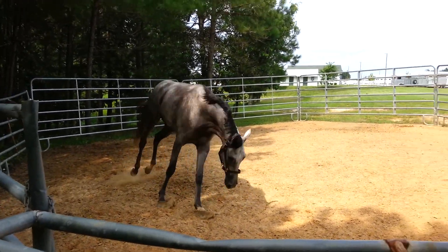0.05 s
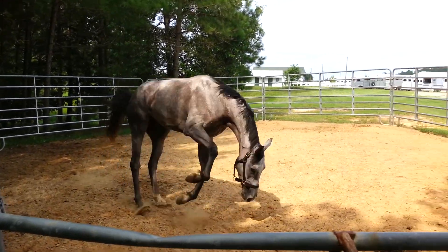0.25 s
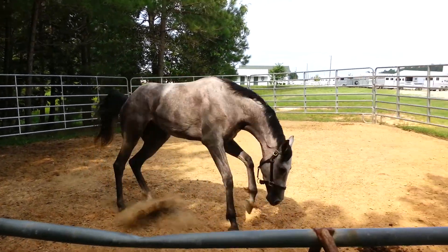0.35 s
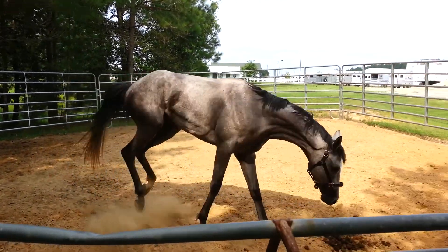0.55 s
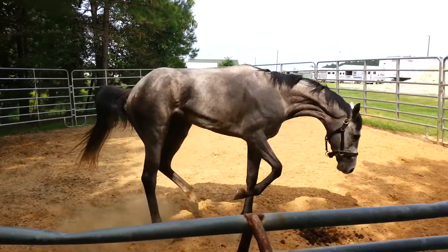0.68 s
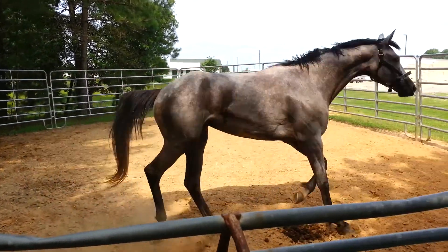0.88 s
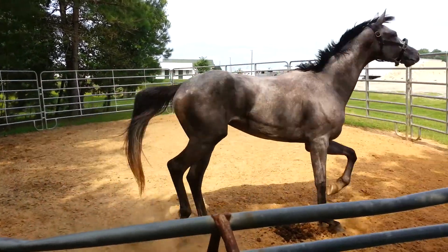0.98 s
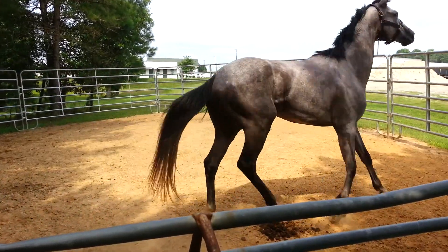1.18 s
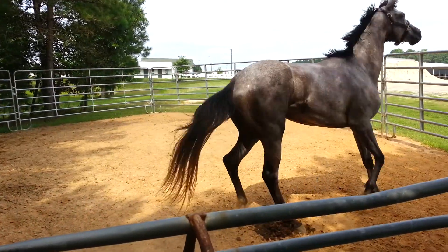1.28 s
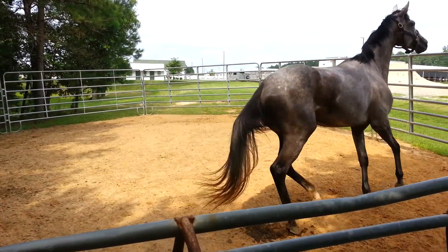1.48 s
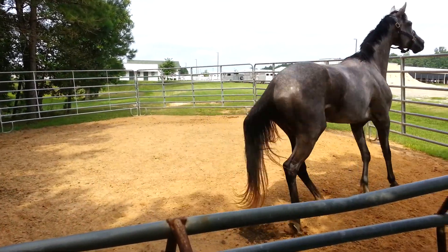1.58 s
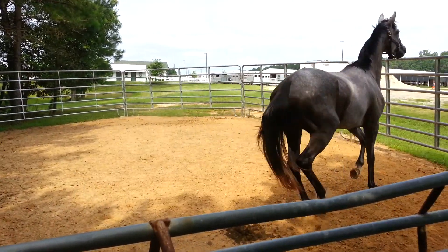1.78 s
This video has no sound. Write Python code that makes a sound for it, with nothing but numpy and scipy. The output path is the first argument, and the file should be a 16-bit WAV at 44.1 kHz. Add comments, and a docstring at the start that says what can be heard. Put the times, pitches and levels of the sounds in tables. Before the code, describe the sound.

One loud, breathy horse snort flutters, whistles briefly and ends hollow, near the microphone in an outdoor pen. Then hooves thud softly and scatter sand, and a halter buckle gives a tiny jingle over a faint distant hum.

```python
"""One long, loud snort from a horse trotting round a sandy outdoor pen.
Air rushes through its nose while the nostrils flutter; the blow whistles at its height and
turns hollow as it ends. Then hooves thud and scatter sand, and a halter buckle jingles.
A far motor hums throughout under a faint insect hiss."""
import sys
import numpy as np
from scipy import signal
from scipy.fft import rfft, irfft
from scipy.io import wavfile
from scipy.ndimage import uniform_filter1d, minimum_filter1d, map_coordinates

SR = 44100
rng = np.random.default_rng(int(sys.argv[2]) if len(sys.argv) > 2 else 0)


def master_out(mix):
    """Clip the mix to full scale and print it as 16-bit PCM to the path in sys.argv[1]."""
    frames = np.transpose(np.atleast_2d(mix))
    ceiling = np.clip(frames, -1, 1)
    pcm = np.round(ceiling * 32767).astype(np.int16)
    wavfile.write(sys.argv[1], SR, pcm)


N = 81585
T = np.arange(N) / SR


def amp(db):
    """Decibels to gain."""
    return 10 ** (np.asarray(db) / 20)


def unit(x):
    """Scale to rms 1."""
    return x / np.sqrt(np.mean(x ** 2) + 1e-20)


def curve(rows, column=1):
    """One column, interpolated linearly in time."""
    rows = np.array(rows)
    return np.interp(T, rows[:, 0], rows[:, column])


def level(rows, column=1):
    """Gain from a dB curve, dying away beyond its ends."""
    outside_s = np.maximum(rows[0][0] - T, 0) + np.maximum(T - rows[-1][0], 0)
    return amp(curve(rows, column)) * np.exp(-outside_s / 0.013)


def colour(x, spectrum):
    """Filter by a spectrum, rms 1."""
    hz, db = np.transpose(spectrum)
    bins_hz = np.fft.rfftfreq(N, 1 / SR)
    gain = amp(np.interp(np.log(bins_hz + 1), np.log(hz), db))
    return unit(irfft(rfft(x) * gain, N))


def noise():
    """White noise."""
    return rng.standard_normal(N)


def wander(hz):
    """Random drift up to a rate, rms 1."""
    rolloff = 1 + (np.fft.rfftfreq(N, 1 / SR) / hz) ** 4
    return unit(irfft(rfft(noise()) / rolloff, N))


def resonate(x, hz, width_hz):
    """Steep resonance whose centre may move, rms 1."""
    carrier = np.exp(2j * np.pi * np.cumsum(hz * np.ones(N)) / SR)
    pole = np.exp(-np.pi * width_hz / SR)
    baseband = signal.lfilter([1], [1, -2 * pole, pole * pole], x / carrier)
    return unit((carrier * baseband).real)


def noise_bands(bands, drive=1):
    """Sum of resonances, each fed its own noise times drive."""
    return sum(amp(db) * resonate(noise() * drive, hz, width_hz) for hz, width_hz, db in bands)


def burst(start_s, rise_s, decay_s):
    """Linear rise, exponential decay."""
    age_s = T - start_s
    return np.clip(age_s / rise_s, 0, 1) * np.exp(-np.maximum(age_s - rise_s, 0) / decay_s)


def ring(start_s, hz, decay_s):
    """Damped sine with a soft onset, envelope peak 1."""
    age_s = np.maximum(T - start_s, 0)
    return age_s / decay_s * np.exp(1 - age_s / decay_s) * np.sin(2 * np.pi * hz * age_s)


def outdoors():
    """Steady far air, a motor hum and thin insect bands."""
    # air spectrum: freq_hz, gain_db
    air_spectrum = [(25,-30),(50,-12.5),(110,-5),(175,-1),(240,-5.5),(420,-11),(560,-12),(900,-15.5),(1500,-21.5),(2900,-21.5),(3700,-17.5),(5000,-19.5),(6500,-28),(10000,-28),(14500,-31.5)]
    # motor and insect bands: centre_hz, width_hz, level_db
    drones = [(176.3,8.7,-57.5),(2234,100,-63.5),(3800,28,-64.5),(4460,130,-66),(5000,44,-65)]
    swell = amp(0.5 * wander(hz=5))
    return amp(-46.5) * colour(noise() * swell, air_spectrum) + noise_bands(drones)


def tree_echo(x, level_db=-28, t60_s=0.6, top_hz=3500):
    """Faint, dull scatter from fence and trees."""
    tail = signal.lfilter(*signal.butter(1, top_hz, fs=SR), noise())
    tail *= np.minimum(T / 0.018, 1) * amp(-60 * T / t60_s)
    return amp(level_db) * signal.fftconvolve(x, tail / np.linalg.norm(tail))[:N]


def buckle():
    """Small metal parts of the halter rattle together."""
    # metal modes: centre_hz, width_hz, gain_db
    modes = [(3330,1400,2),(4960,2200,0),(6740,170,0),(7640,1800,-2.5),(10300,560,-4),(11300,350,-3.5),(12810,400,-5)]
    return amp(-39) * unit(noise_bands(modes)) * burst(start_s=1.724, rise_s=0.012, decay_s=0.018)


def sand(spectrum, clump_db):
    """Clumped sand grains: noise with a fast random level."""
    return colour(noise() * amp(clump_db * wander(hz=500)), spectrum)


def scuffs():
    """Hooves scuff through sand."""
    # scuffs: start_s, level_db, rise_s, decay_s
    strokes = [(0.041,-38,0.0034,0.012),(0.053,-38.5,0.013,0.012),(0.894,-45,0.0061,0.073),(1.284,-42.5,.01,0.0084),(1.540,-40,0.005,0.0057),(1.586,-37,0.0065,0.0088)]
    # scuff spectrum: freq_hz, gain_db
    spectrum = [(100,-29),(500,1.5),(1100,0.5),(1800,-2.5),(2800,-8.5),(4500,-11.5),(7000,-17),(14000,-27.5)]
    envelope = sum(amp(db) * burst(start_s, rise_s, decay_s) for start_s, db, rise_s, decay_s in strokes)
    return sand(spectrum, clump_db=3) * envelope


def hooves():
    """Each hoof gives a dead thud, a ground thump, a knock of horn and a spray of sand."""
    # impacts: time_s, thud_db, thud_hz, ground_db, knock_hz, knock_db, sand_db, sand_decay_s
    impacts = [(.828,-21.5,790,-31.5,1140,-32.5,-32,0.016),(0.881,-20,890,-48,1120,-32.5,-31.5,0.011),(.9,-32,400,-38,467,-41,-52,.01),(1.2445,-29.5,510,-56,603,-31.5,-46,0.022),(1.2499,-25.5,1080,-54,1584,-42,-37,0.014),(1.2703,-36,450,-50,584,-45,-50,.008),(1.5952,-22,990,-36,1000,-36.5,-31.5,0.013),(1.6464,-22.5,540,-32,716,-37,-35,0.0098)]
    # spray spectrum: freq_hz, gain_db
    spray_spectrum = [(60,-10),(200,-0.5),(550,2.5),(1150,-0.5),(1450,-4.5),(2200,-6),(2900,-13),(4000,-10.5),(6500,-24.5),(14000,-32)]
    grains = sand(spray_spectrum, clump_db=4.5)
    out = np.zeros(N)
    for time_s, thud_db, thud_hz, ground_db, knock_hz, knock_db, sand_db, sand_decay_s in impacts:
        width_s = 0.33 / thud_hz
        offset = (T - time_s) / width_s
        out += amp(thud_db) * (2 * offset ** 2 - 1) * np.exp(-offset ** 2)
        out += amp(ground_db) * ring(time_s, hz=226, decay_s=0.0033)
        out += amp(knock_db) * ring(time_s, knock_hz, decay_s=0.004)
        out += amp(sand_db) * grains * burst(time_s, rise_s=0.0015, decay_s=sand_decay_s)
    return out


def edge_tone(hz, jitter=0.011, waver_db=1.1):
    """A whistle tone made unsteady by turbulence."""
    phase = 2 * np.pi * np.cumsum(hz * (1 + jitter * wander(hz=68))) / SR
    return unit(np.sin(phase) * amp(waver_db * wander(hz=60)))


def whistle():
    """One long edge tone in the nostril, two short falling ones at the hardest push."""
    # long tone: time_s, pitch_hz, level_db
    tone = [(.19,574,-47),(.225,516.6,-29),(.27,481.1,-29.5),(.32,514.2,-33),(.385,531.8,-24),(.425,529.4,-24.5),(.46,534,-15.5),(.505,552.3,-19.5),(.53,577.6,-24.5),(.57,554.3,-29.5),(.65,550.2,-40)]
    # short tones: start_s, length_s, from_hz, to_hz, level_db
    squeals = [(0.371,0.101,745,682,-20),(0.373,.075,1090,1038,-18.5)]
    out = edge_tone(curve(tone)) * level(tone, column=2)
    for start_s, length_s, from_hz, to_hz, db in squeals:
        progress = np.clip((T - start_s) / length_s, 0, 1)
        out += amp(db) * np.sin(np.pi * progress) * edge_tone(from_hz + (to_hz - from_hz) * progress)
    return out


def nostril_buzz(phase, waver_db=0.5):
    """Harmonics of the fluttering nostrils, each wavering in level."""
    # harmonics: order, gain_db
    harmonics = [(1,-8),(2,0.5),(3,1.5),(4,1)]
    return unit(sum(amp(db + waver_db * wander(hz=24.7)) * np.cos(order * (phase + order * np.pi / 4))
                    for order, db in harmonics))


def nostril_flaps():
    """Single hard flaps of the nostrils."""
    # flaps: start_s, peak_db, pitch_hz, decay_s
    flaps = [(0.3098,-15.5,270,0.0019),(.393,-1,1030,0.00065),(0.483,-12,865,0.00078),(0.527,-13,291,0.0015),(.690,-5.5,622,0.0023)]
    return sum(amp(db) * ring(start_s, hz, decay_s) for start_s, db, hz, decay_s in flaps)


def relax(x, sag=0.091, from_s=0.55, to_s=0.76):
    """The spectrum sinks as the nostrils slacken."""
    speed = 1 - sag * np.clip((T - from_s) / (to_s - from_s), 0, 1)
    return map_coordinates(x, [np.cumsum(speed)], order=3, mode="mirror")


def air_rush(flow):
    """Turbulent air through the nose: the body of the blow."""
    # rush envelope: time_s, level_db
    envelope = [(.12,-64),(.15,-44.5),(.195,-44.5),(.225,-28),(.262,-21),(.3,-20),(.352,-21),(.39,-16),(.42,-15.5),(.45,-17.5),(.495,-13.5),(.53,-18),(.56,-19.5),(.615,-23),(.665,-27),(.705,-31),(.735,-38),(.78,-39),(.82,-62)]
    # rush spectrum before the sag: freq_hz, gain_db
    spectrum = [(40,-46),(90,-25),(160,-7.5),(320,-7),(430,-12),(560,0),(860,-5),(1060,3),(1300,-1.5),(1480,-5.5),(1640,-1.5),(1850,-22.5),(2600,-48),(6000,-68)]
    return relax(colour(noise() * flow, spectrum)) * level(envelope)


def nose_hiss(flow):
    """The air jet hisses, sounds narrow upper resonances and spurts wetly."""
    # hiss envelope: time_s, level_db
    envelope = [(.16,-57),(.21,-45),(.25,-34),(.278,-29.5),(.345,-28),(.385,-25),(.412,-20.5),(.445,-25.5),(.529,-24),(.54,-29),(.615,-29.5),(.645,-34),(.7,-32.5),(.76,-39.5),(.8,-50)]
    # hiss spectrum before the sag: freq_hz, gain_db
    spectrum = [(900,-60),(1800,-3),(2020,0),(2380,-0.5),(2600,0),(2900,-8.5),(3550,-4),(4250,-10.5),(5100,-11.5),(6500,-17),(7800,-20.5),(9500,-26),(14500,-54)]
    # upper nasal resonances before the sag: centre_hz, width_hz, gain_db
    resonances = [(2353,170,-8),(3785,200,-16)]
    # wet spurts: start_s, level_db
    spurts = [(0.238,-36),(0.407,-24.5),(0.5263,-26.5),(0.613,-32.5)]
    hiss = unit(colour(noise() * flow, spectrum) + noise_bands(resonances, flow))
    spurt_gain = sum(amp(db) * burst(start_s, rise_s=0.0026, decay_s=0.0021) for start_s, db in spurts)
    return relax(hiss) * (level(envelope) + spurt_gain)


def nasal_hollow(flow):
    """Hollow resonances of the nose rise, then fall as the blow closes."""
    # resonance envelope: time_s, level_db
    envelope = [(.13,-59),(.16,-45),(.2,-39),(.27,-31),(.34,-27.5),(.39,-15.5),(.44,-22.5),(.53,-20),(.6,-22),(.66,-19),(.705,-16),(.73,-27),(.76,-33.5),(.795,-54)]
    # nasal resonances: base_hz, width_hz, gain_db
    resonances = [(575.5,120,-8),(715,130,-4)]
    # resonance glide: time_s, freq_ratio
    glide = [(.2,0.81),(.39,1.07),(.46,1.062),(.55,1.057),(.64,0.973),(.72,0.85)]
    # overall filter: freq_hz, gain_db
    spectrum = [(100,-18),(450,-0.5),(760,0.5),(880,-4),(3000,-15)]
    hollow = sum(amp(db) * resonate(noise() * flow, base_hz * curve(glide), width_hz)
                 for base_hz, width_hz, db in resonances)
    hollow = colour(hollow, spectrum)
    local_rms = np.sqrt(uniform_filter1d(hollow ** 2, size=700) + 0.05)
    return unit(hollow / local_rms) * level(envelope)  # random swells evened out


def snort(jitter=0.03, chop_depth=0.097, rush_sputter_db=1.15, hiss_sputter_db=0.85):
    """Fluttering nostrils buzz and chop a turbulent air stream, which sounds the nose."""
    # nostril flutter: time_s, rate_hz, buzz_db
    flutter = [(.19,77.9,-49),(.24,80.17,-33.5),(.3,82.8,-32),(.35,85.24,-29.5),(.39,91.2,-24),(.45,88.8,-23.5),(.52,87.5,-27),(.6,89.44,-32),(.68,81.9,-34.5),(.77,70.4,-50.5)]
    rate_hz = curve(flutter) * (1 + jitter * wander(hz=60))
    phase = 2 * np.pi * np.cumsum(rate_hz) / SR
    chop = 1 + chop_depth * np.cos(phase)
    sputter = wander(hz=220)
    buzz = nostril_buzz(phase) * level(flutter, column=2)
    rush = air_rush(chop * amp(rush_sputter_db * sputter))
    hiss = nose_hiss(chop * amp(hiss_sputter_db * sputter))
    return buzz + rush + hiss + nasal_hollow(chop) + nostril_flaps()


def scene():
    """The horse in the open pen, mono."""
    horse = snort() + whistle() + hooves() + scuffs() + buckle()
    return (horse + tree_echo(horse) + outdoors())[None]


def record(dry, low_cut_hz=59, top_hz=14750):
    """Microphone low cut, fast limiter at full scale, band limit."""
    highpassed = signal.lfilter(*signal.butter(2, low_cut_hz, "highpass", fs=SR), dry)
    gain = 1 / np.maximum(abs(highpassed), 1)
    gain = uniform_filter1d(minimum_filter1d(gain, size=131), size=131)
    lowpass = signal.firwin(1023, top_hz, window=("kaiser", 9), fs=SR)
    return signal.oaconvolve(highpassed * gain, lowpass[None], "same")


dry = scene()
out = record(dry)
master_out(out)
```